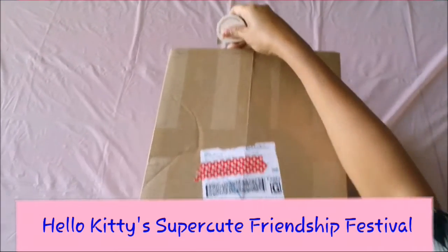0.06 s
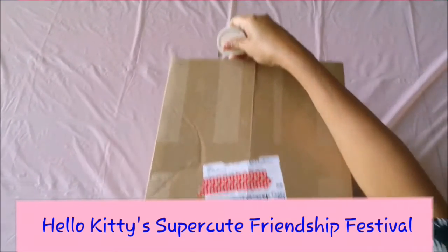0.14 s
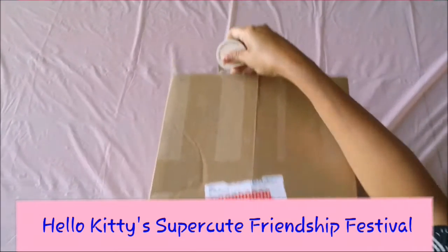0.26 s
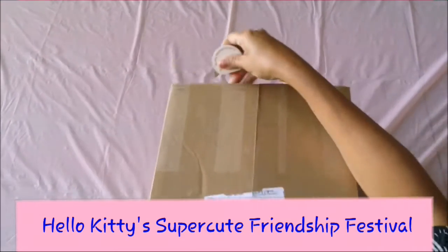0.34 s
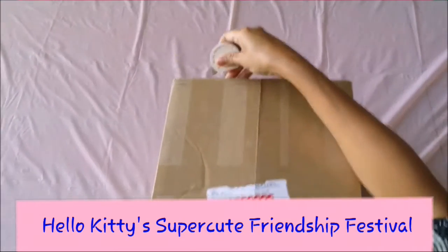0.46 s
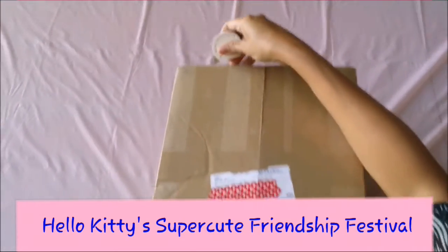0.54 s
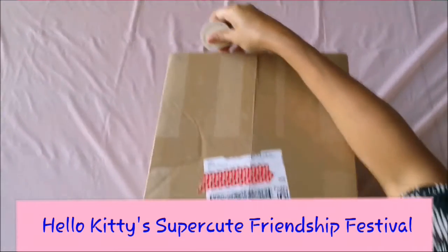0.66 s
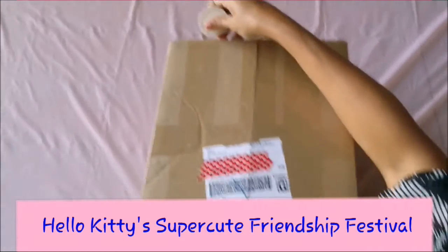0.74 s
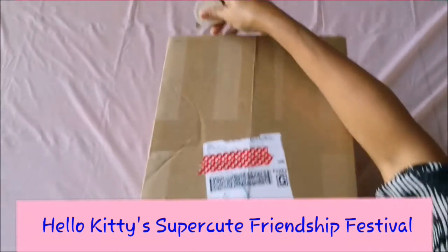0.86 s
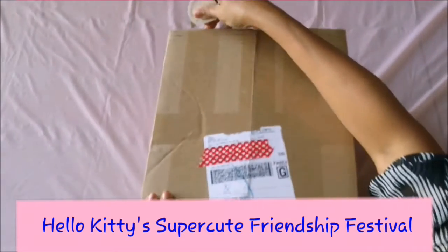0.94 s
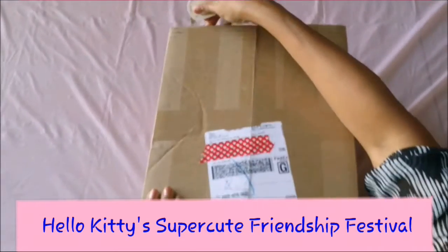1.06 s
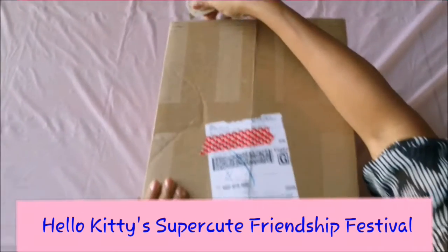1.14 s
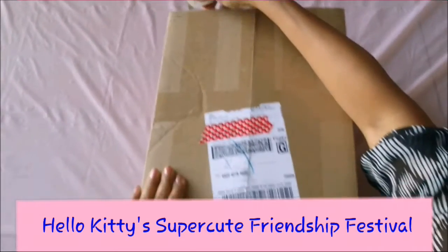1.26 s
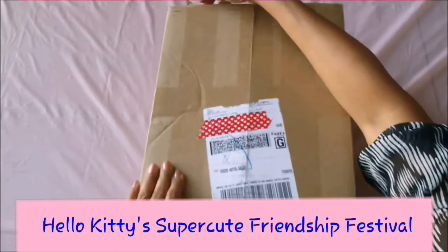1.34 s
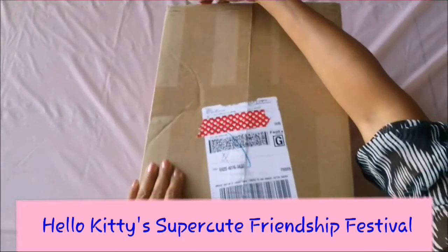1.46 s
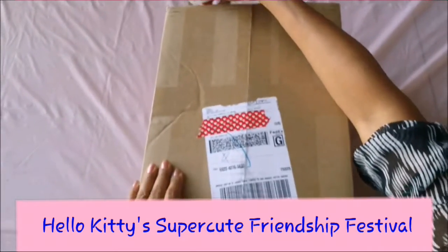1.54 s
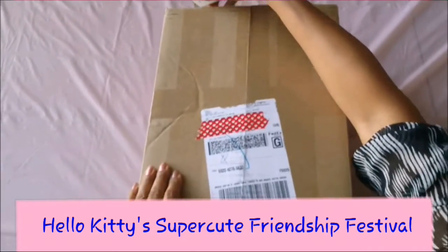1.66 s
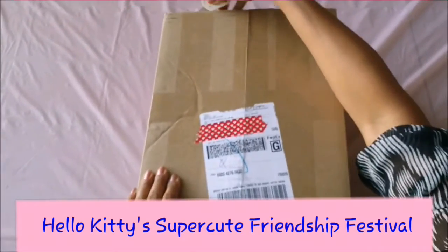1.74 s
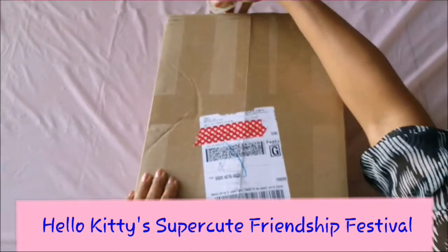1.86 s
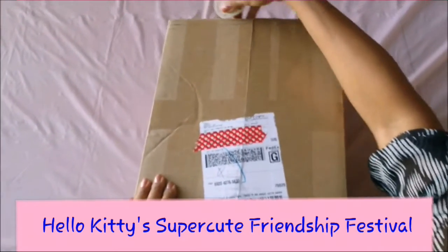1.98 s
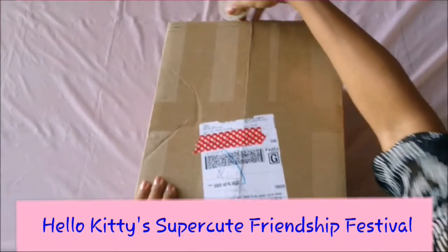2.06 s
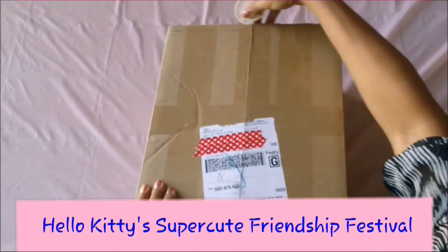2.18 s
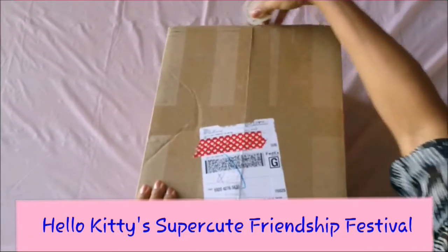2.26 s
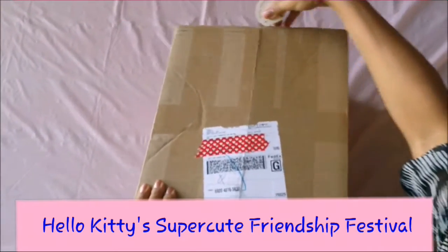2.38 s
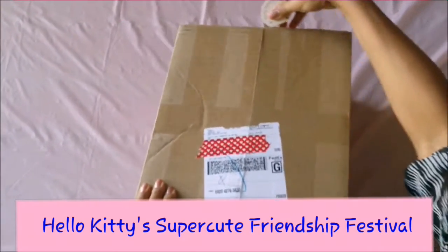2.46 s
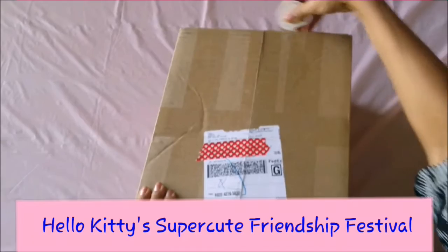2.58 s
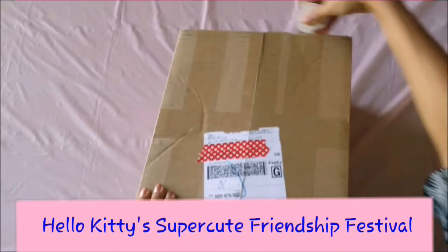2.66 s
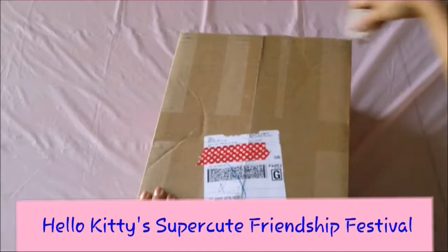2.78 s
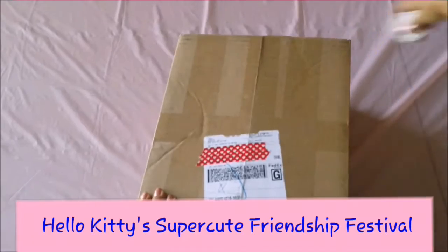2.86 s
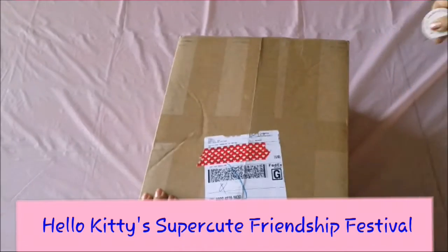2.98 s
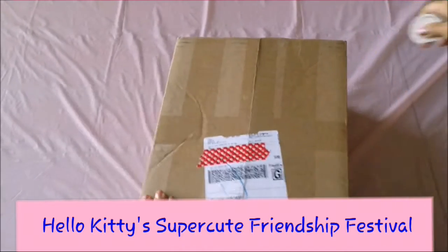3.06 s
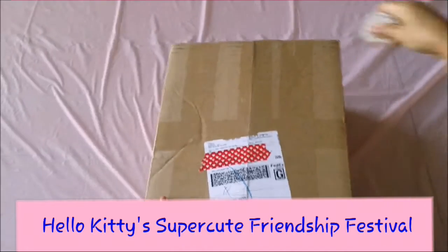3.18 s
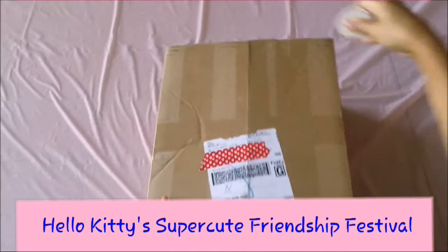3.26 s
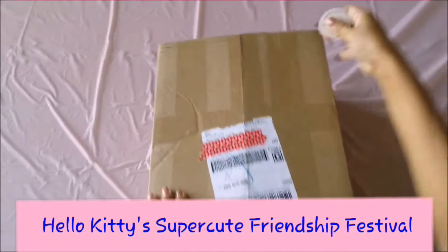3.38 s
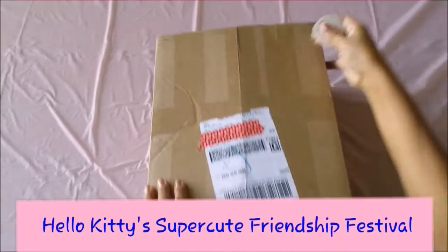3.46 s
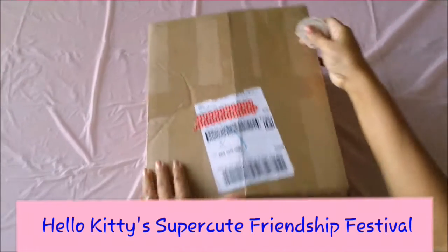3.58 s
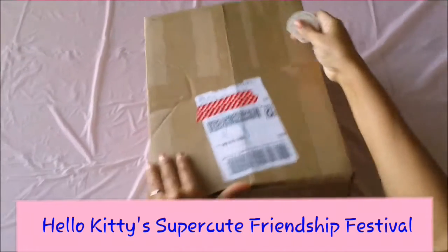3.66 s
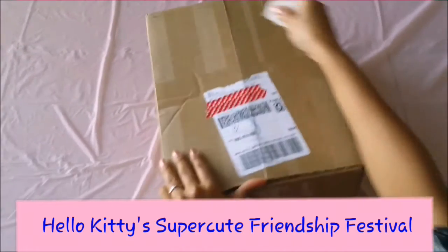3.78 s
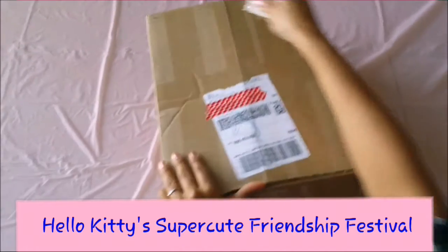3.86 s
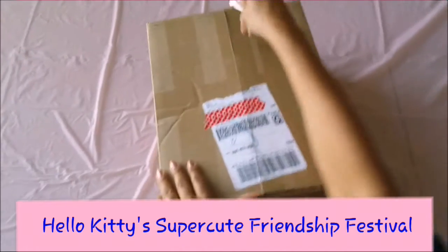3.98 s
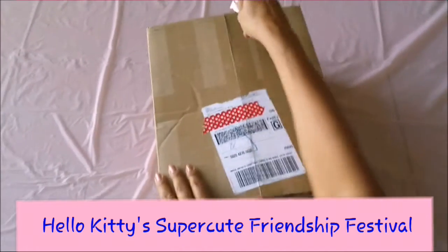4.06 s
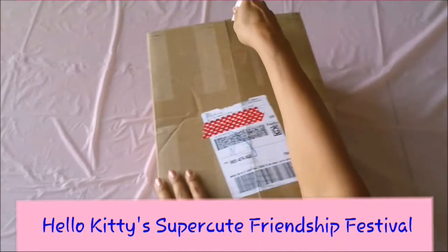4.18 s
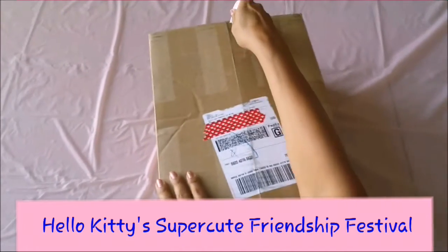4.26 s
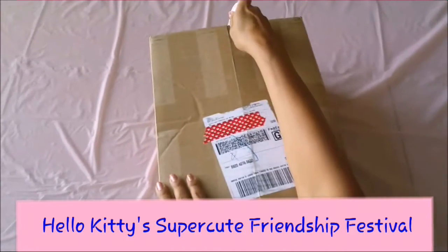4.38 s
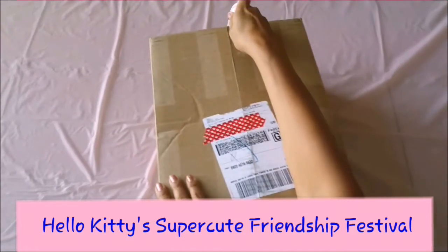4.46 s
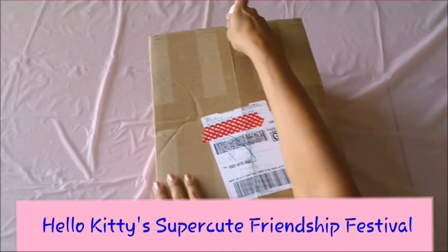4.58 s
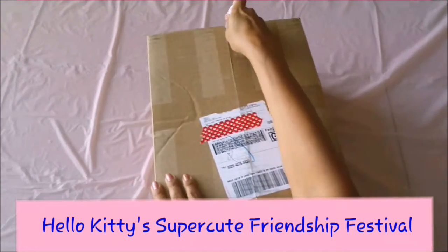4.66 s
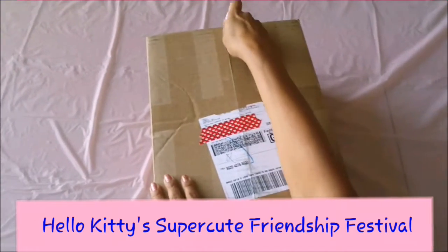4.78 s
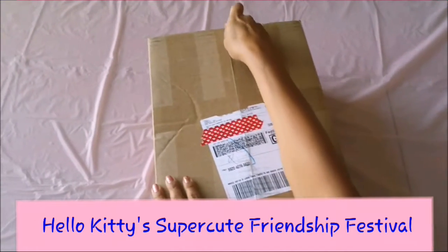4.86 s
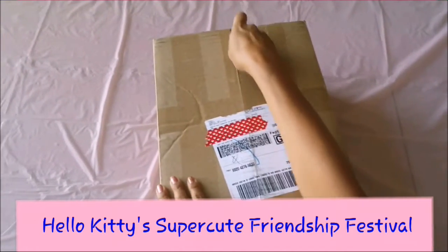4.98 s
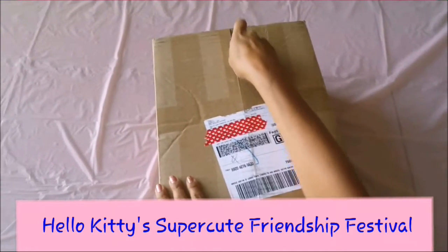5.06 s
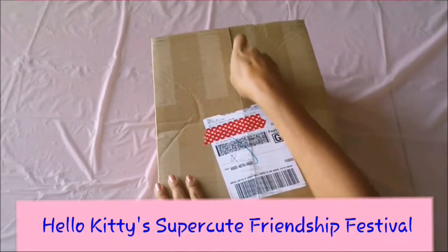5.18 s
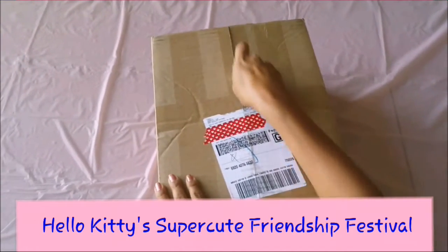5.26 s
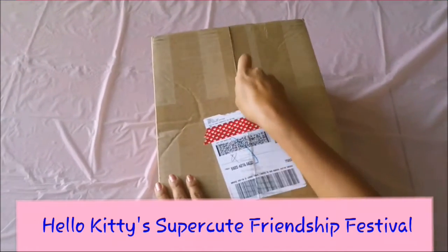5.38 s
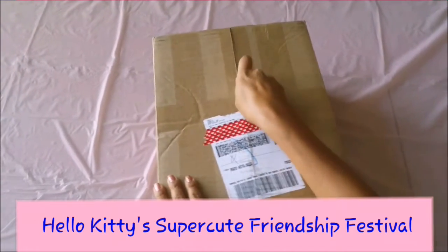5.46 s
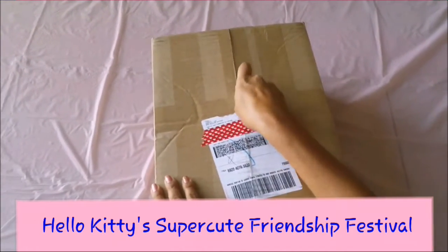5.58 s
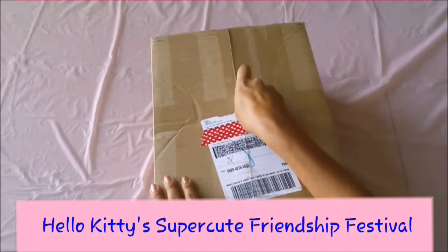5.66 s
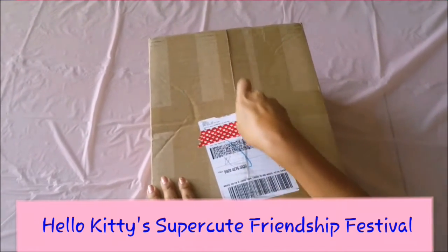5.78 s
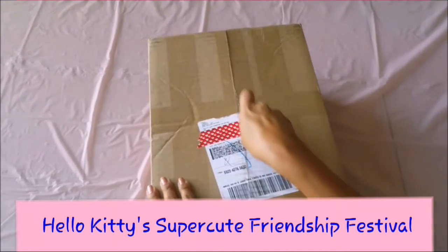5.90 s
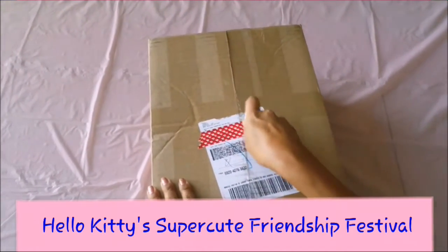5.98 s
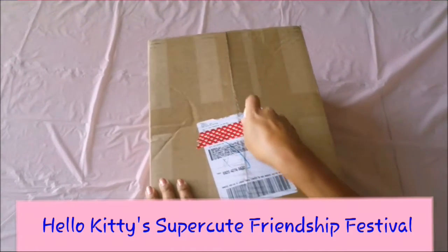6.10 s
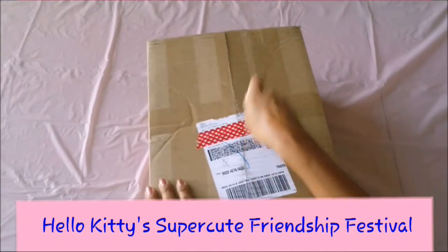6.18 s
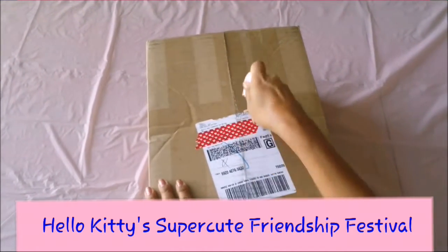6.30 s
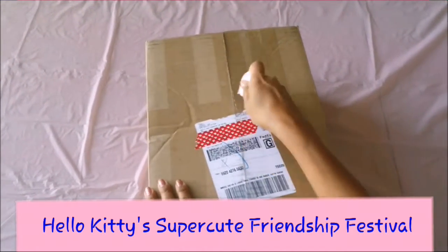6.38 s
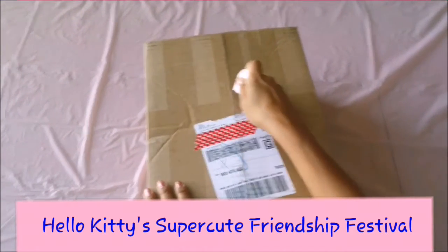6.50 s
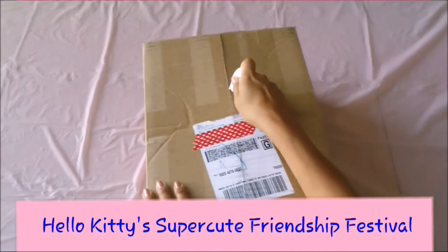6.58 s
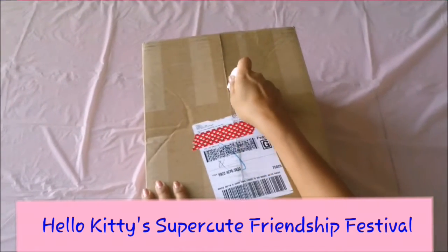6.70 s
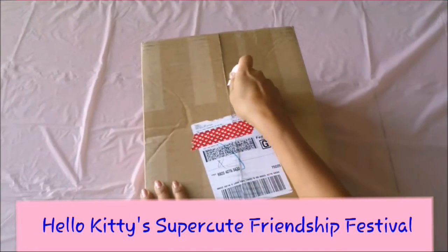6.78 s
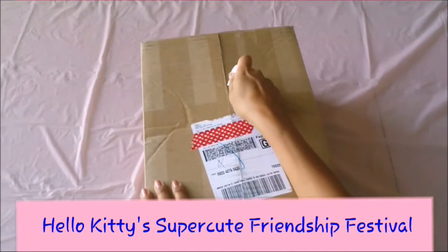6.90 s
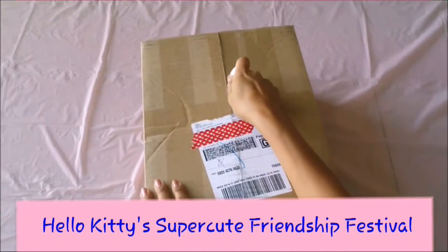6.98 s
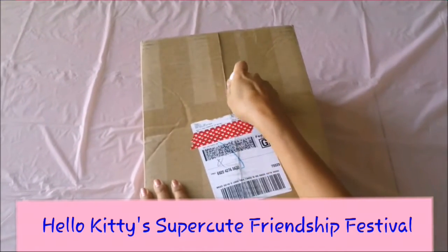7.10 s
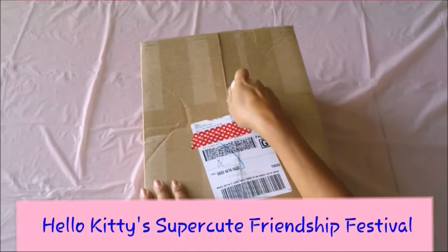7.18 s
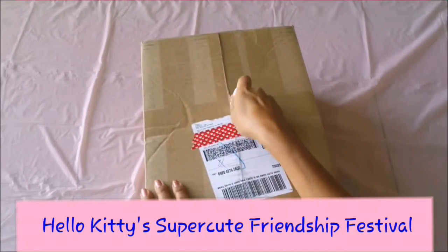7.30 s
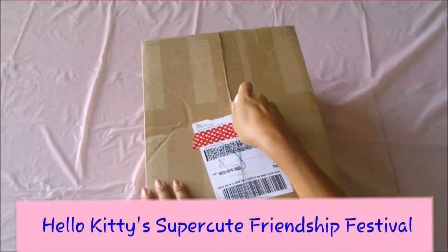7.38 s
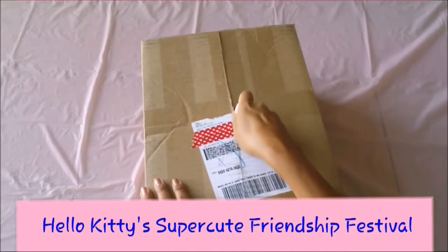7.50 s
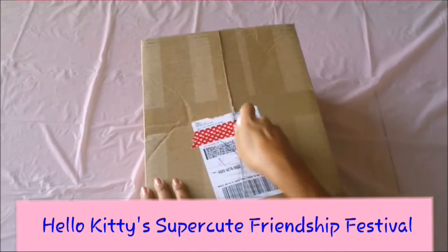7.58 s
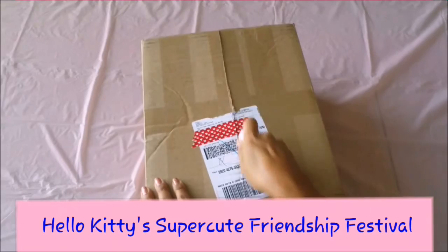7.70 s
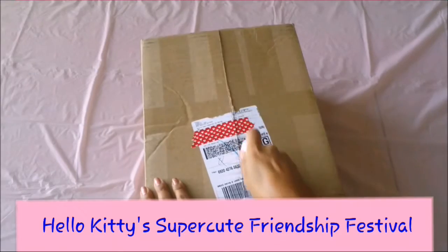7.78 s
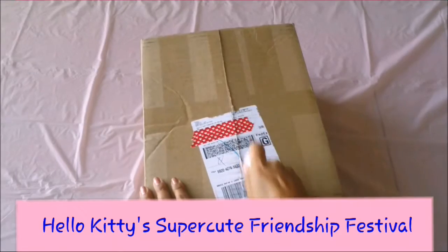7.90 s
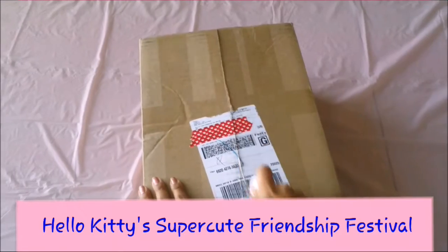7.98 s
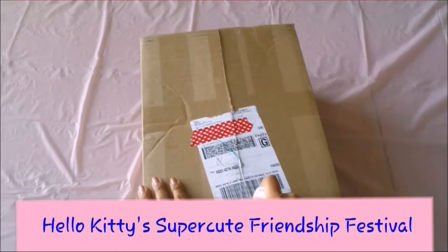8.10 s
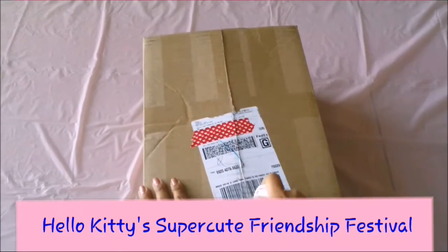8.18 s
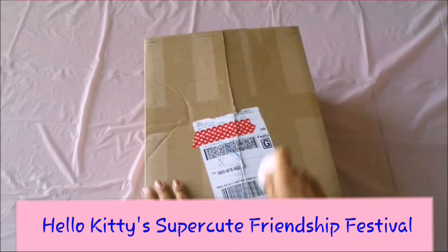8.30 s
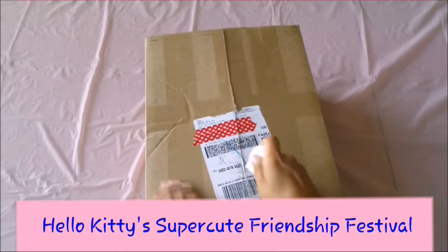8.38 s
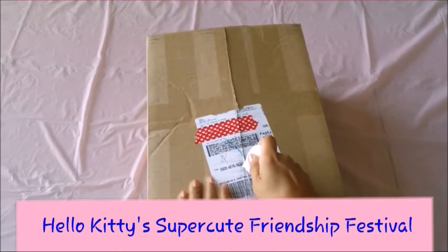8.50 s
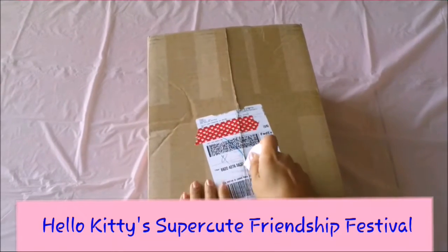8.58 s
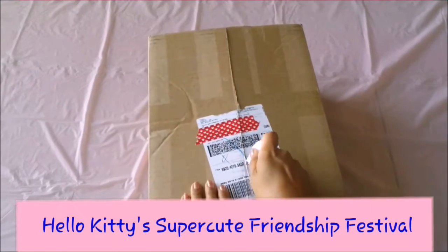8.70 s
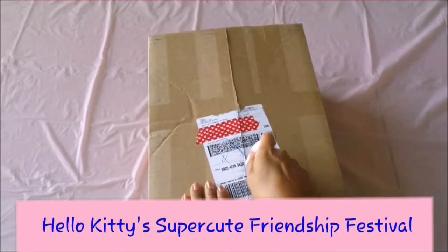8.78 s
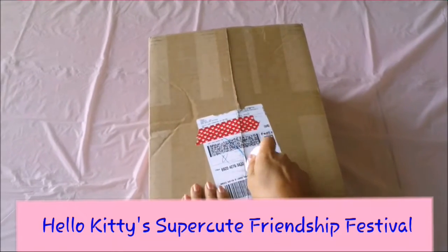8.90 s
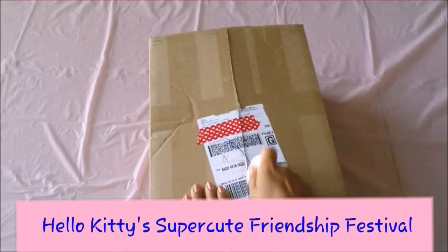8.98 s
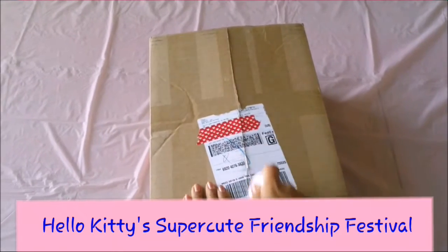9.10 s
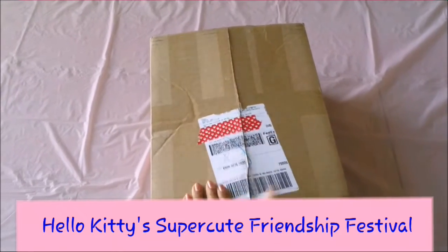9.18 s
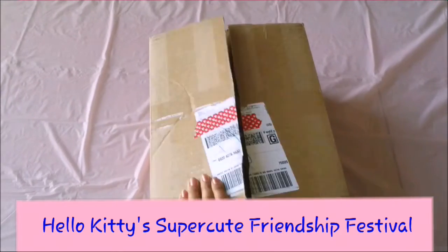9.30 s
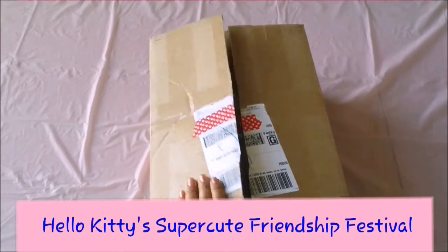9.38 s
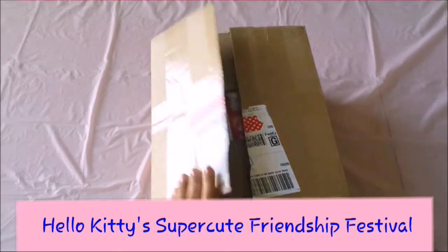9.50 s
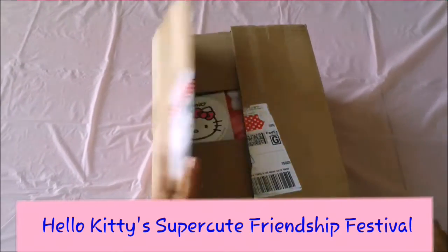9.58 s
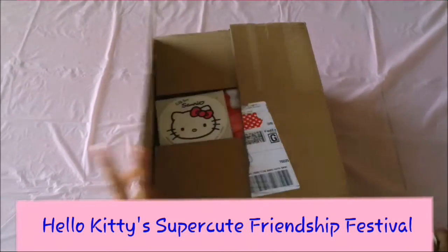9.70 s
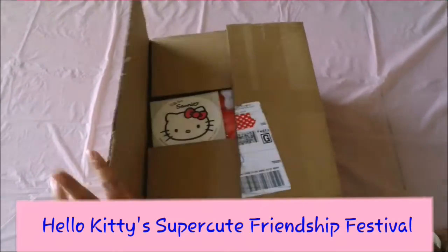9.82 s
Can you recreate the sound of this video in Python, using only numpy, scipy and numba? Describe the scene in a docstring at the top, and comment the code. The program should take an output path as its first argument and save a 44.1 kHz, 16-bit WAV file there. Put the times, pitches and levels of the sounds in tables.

```python
"""Scratchy strokes and sharp snaps over a hollow drumming: a hand cutter slits a cardboard box's tape.
The box stands on a cloth-covered table. Blade, hands and sliding box rub out a hiss, the taut tape zips,
the flaps rasp and the box drums along. Snapping tape fibres tick in the flaps; soft knocks ring the box.
Two small microphone ports hear it from above, in a quiet room."""
import sys
import numpy as np
from scipy import signal
from scipy.fft import rfft, irfft
from scipy.io import wavfile
from numba import njit

SR = 44100
rng = np.random.default_rng(int(sys.argv[2]) if len(sys.argv) > 2 else 0)


def file_out(sig):
    """Save sig as 16-bit WAV at sys.argv[1]."""
    # one column per channel
    cols = np.atleast_2d(sig).T
    # limit, then scale
    lim = np.clip(cols, -1, 1)
    pcm = np.round(lim * 32767).astype(np.int16)
    wavfile.write(sys.argv[1], SR, pcm)


N = 434385

# Colour of the still air: freq_hz, level_db
AIR_COLOUR = [(15, -30), (25, 1), (44, -12.5), (89, 0.5), (127, 2), (195, -7.5), (249, -11), (503, -10.5),
              (2610, -17), (3720, -23.5), (7920, -23), (14400, -29), (16000, -34)]
# How alike the two ports sound: freq_hz, likeness (1 the same, 0 or less unrelated)
PORT_LIKENESS = [(60, 0.92), (130, 0.91), (290, 0.88), (640, 0.63), (1410, 0.18), (3100, 0.077),
                 (6820, -0.077), (15000, -0.76)]
# Left port over right port: freq_hz, balance_db
PORT_BALANCE = [(60, -2), (200, 1.5), (700, -0.5), (1290, -1.5), (2380, 1.5), (4400, 8.5), (6200, 4),
                (8200, -3), (10500, -1.5), (15000, 4)]
# Resonances of the hollow box: pitch_hz, width_hz, level_db
BOX_MODES = [(79, 33, -9), (111, 22.4, 2.5), (155, 32.6, 0.5), (209.4, 58, -2.5), (260, 59, -2),
             (337.5, 24.3, -2.5), (388.4, 50, -3.5), (465, 88, -8), (663, 165, -12), (1027, 250, -16)]
# Resonances of the flaps: pitch_hz, width_hz, level_db
FLAP_MODES = [(780, 270, 0.5), (1060, 490, 2.5), (1490, 430, -0.5), (1830, 1000, -6.5), (2480, 610, 8),
              (3300, 2400, -10.5)]
# Colour of the rubbing hiss and of the cracks: freq_hz, level_db
HISS_COLOUR = [(1470, -18), (2500, -13), (3310, -8.5), (3770, -11), (5230, -8.5), (6060, -6), (8270, -2),
               (9890, -10), (14800, -13), (15500, -28), (16000, -10.5)]
# Knocks on the box panels: start_s, level_db, pitch_hz
BOX_KNOCKS = [(1.155, -42, 472), (1.8, -45, 91.5), (1.995, -45, 1070), (2.098, -43, 1020),
              (2.236, -44, 167), (2.347, -36.5, 375), (2.418, -44, 234), (2.89, -26.5, 286),
              (3.346, -44, 436), (3.631, -37.5, 483), (4.398, -54, 150), (4.634, -36.5, 705),
              (4.845, -37.5, 405), (5.36, -28, 264), (5.409, -28.5, 267), (5.706, -31, 326),
              (5.746, -32, 263), (5.761, -27.5, 265), (5.804, -21.5, 257), (5.837, -24, 247),
              (5.871, -25.5, 255), (5.946, -33, 330), (5.996, -31, 177), (6.05, -26.5, 260),
              (6.215, -40.5, 380), (6.263, -32, 262), (6.738, -43.5, 375), (6.843, -59, 328),
              (6.932, -54, 250), (7.048, -37.5, 325), (7.147, -38, 114), (7.341, -34.5, 238),
              (7.4, -32.5, 320), (7.47, -29.5, 234), (7.548, -33, 142), (7.732, -29, 134),
              (7.765, -29, 182), (7.983, -36, 125), (8.142, -36.5, 114), (8.299, -43, 160),
              (8.342, -40, 384), (8.486, -51, 915), (8.816, -43.5, 153), (8.895, -50, 199),
              (8.903, -37.5, 160), (9.091, -46, 121), (9.283, -20.5, 154), (9.486, -54.5, 148),
              (9.839, -20.5, 956)]
# Tape and fibre snaps: start_s, crack_db, tick_db (relative to the crack), flap_pitch_hz
TAPE_SNAPS = [(0.7167, -21.5, -12.5, 4290), (0.856, -38.5, -24, 4460), (0.883, -40, -4.5, 2440),
              (1.0593, -48, -16, 1730), (1.096, -43.5, -5, 1780), (1.268, -56, -4, 1500),
              (1.407, -43.5, -12, 3630), (1.442, -51, -4, 2400), (1.456, -48, -11, 2400),
              (1.5733, -44.5, -4, 1470), (1.6406, -35, -27, 1470), (1.6856, -29, -38, 1480),
              (1.997, -45, -21, 1630), (2.0207, -31.5, -1.5, 1230), (2.0992, -28.5, -8, 1390),
              (2.2733, -19, -12.5, 1040), (2.3154, -21.5, -21, 3370), (2.332, -40, -20, 3400),
              (2.3532, -28, -4, 1270), (2.4376, -37, -15, 1520), (2.4999, -35, -6, 2670),
              (2.551, -32.5, -8, 1370), (3.291, -34, -18, 1610), (3.3418, -35.5, -32, 1290),
              (3.996, -54.5, -5, 2500), (4.2506, -41.5, -15, 1150), (4.6377, -37.5, -3, 1260),
              (4.843, -38, 5.5, 1410), (5.554, -51, 7, 1550), (5.6562, -33.5, -25, 1550),
              (5.761, -31, -6, 1530), (5.8053, -20.5, -13, 1370), (5.8376, -24.5, -25, 2280),
              (5.998, -29.5, -6, 1340), (7.0477, -51, -3, 2150), (7.145, -36, -8.5, 1590),
              (7.18, -46, -9, 2150), (7.402, -28.5, -6, 1540), (7.4734, -34, -1, 1390),
              (7.663, -30, -24, 1110), (7.766, -24, -23, 1210), (8.098, -49, -7, 991),
              (8.1435, -26, -17, 990), (8.241, -38, -25, 1670), (8.3442, -36, -3.5, 1250),
              (8.4916, -35, -1, 2880), (8.497, -36, 4, 2070), (8.7798, -51.5, 4, 2600),
              (8.786, -50.5, 5, 2550), (8.8185, -38.5, 9, 2080), (8.8926, -47.5, 7, 950),
              (8.907, -43.5, 1, 1500), (9.0473, -51, -12, 1510), (9.151, -27, -15, 1870),
              (9.189, -26, -19, 3510), (9.2253, -16, -27, 4370), (9.2828, -17, -8.5, 1600),
              (9.617, -46, -7, 2510), (9.773, -53, -4, 2500)]
# Zip of the taut tape and hollow of the flap gap: time_s, zip_hz, hollow_hz, hollow_db (relative to rasp)
SLIT_TONES = [(0, 8450, 1800, -1.5), (1.55, 7600, 1510, 2.5), (1.92, 7800, 1230, 2),
              (2.4, 8300, 1220, -3.5), (2.58, 9200, 1410, -1.5), (2.9, 7900, 1350, -5),
              (3.3, 8400, 1710, -7), (4.8, 8290, 1630, 2), (5.05, 9030, 1530, -3), (5.45, 8430, 1750, -1),
              (5.8, 8100, 1470, -4.5), (7.75, 7730, 1355, -2), (8.15, 8100, 1220, -7.5),
              (8.5, 8240, 2070, 0), (9.1, 7100, 1530, -7.5), (9.85, 7900, 1520, -0.5)]
# Strokes of blade, hands and sliding box, with rasp and drum relative to the hiss:
# start_s, length_s, hiss_start_db, hiss_end_db, rasp_db, drum_start_db, drum_end_db
RUB_STROKES = [(0, 0.39, -43, -43, -16, -20, -20.5), (.72, 0.067, -63, -65.5, -17, -1, 4.5),
               (0.863, 0.069, -64, -71.5, -5, -1, 3), (1.057, 0.03, -70, -65.5, -3, -5, -8),
               (1.4, 0.1, -72, -81, 1, 0, -10), (1.635, 0.26, -45.5, -42.5, -8.5, -18, -3),
               (2.0, 0.022, -47.5, -41.5, -4.7, -12, -1.5), (2.105, .27, -45, -42, -6, -2.5, -4.5),
               (2.4, 0.17, -55, -52, -3.5, 0.1, -7), (2.577, .14, -40, -35, -7, -20, -20),
               (2.749, 0.13, -35.5, -31, -6.5, -15.5, -21), (2.967, 0.11, -64.5, -62, -4.5, 10, -7),
               (3.123, 0.27, -65, -50.5, -4.5, -0.5, -4.5), (3.419, 0.38, -43.5, -41.5, -14.5, -24, -16),
               (3.99, 0.064, -72.5, -65, -12, -5, -8), (4.645, 0.08, -61, -75, -8, 3.5, -1),
               (4.802, .03, -64, -61, -3.5, 5, -7), (4.84, .04, -45.5, -55, -7, 1, 0),
               (4.886, .11, -52, -50.5, -2.5, -9, -2.5), (5.053, 0.19, -47.5, -43, -5, -9.5, -5),
               (5.268, 0.19, -46.5, -43.5, -2.5, -3.5, -4), (5.564, 0.025, -49.5, -45, 3, 3.5, -7),
               (5.666, 0.023, -46.5, -43.5, 0.5, 2, -2), (5.786, .17, -41, -47.5, -3, 3, 4),
               (5.982, 0.066, -45, -49, -3, 7, -6), (6.216, .05, -68.5, -57.5, 1.5, 13.5, 10),
               (6.741, 0.013, -60, -68, -0.5, 0, -4), (7.052, 0.052, -60, -72.5, 0, 13.5, 7),
               (7.105, 0.264, -58.5, -46, -2.6, 4, -2.5), (7.408, 0.037, -44, -52.5, -2.5, 0, -3),
               (7.475, 0.058, -46, -44.5, -5.5, 2, -2), (7.554, 0.375, -44.5, -39, -7.5, -3, -4),
               (7.982, 0.2, -33, -44.5, -4.5, -1, -9.5), (8.176, 0.14, -56, -65.5, 0, -1, 5),
               (8.33, 0.0081, -51.5, -53, -4, 3, 7), (8.38, 0.074, -57, -59, -13, 1, -6),
               (8.493, 0.041, -53.5, -75, 1.5, 2, 15), (8.821, 0.045, -62, -67, -2, 14.5, -1),
               (8.892, 0.12, -56.5, -68.5, 1.5, 14.5, 5), (9.087, .21, -38, -36, -5.5, -2.5, -9),
               (9.315, 0.11, -57.5, -67.5, -7, 18, 3), (9.494, 0.11, -57.5, -58, -10, -1.5, -12),
               (9.777, 0.075, -71, -55.5, -5, -2, -2), (9.857, 0.018, -44.5, -50.5, 19, 26.5, 15)]

AIR_DB = -70
ROOM_T60_S, ROOM_DB, WALL_CUT_HZ = 0.37, -13, 7000
RUMBLE_CUT_HZ, TOP_CUT_HZ, FINGER_CUT_HZ = 42, 16000, 1230
SPOT_OCTAVES = 0.23   # a blow reaches the modes this near to the pitch of the struck spot
SPIKE_DB, SPIKE_T60_S, SNAP_T60_S, RUSTLE_T60_S = 1.5, 0.002, 0.018, 0.2
REST_HISS_DB, REST_RASP_DB, REST_DRUM_DB = -87, -81, -71   # hands resting on the box between strokes
ATTACK_DB_PER_S, JERK_SHARPNESS = 346, 3.5   # a fading stroke starts with a jerk, so its attack is faster
SLIDE_RELEASE_DB_PER_S, BITE_RELEASE_DB_PER_S = 192, 447   # a slide eases off, a biting blade stops short
WAVER_DB = 1.5   # the hand never presses evenly
ZIP_SLIDE_DB, ZIP_BITE_DB = -9.5, -3   # relative to the hiss
ZIP_WIDTH_HZ, HOLLOW_WIDTH_HZ = 2160, 690
FLAP_LOW_HZ, FLAP_HIGH_HZ = 540, 4380   # the flaps radiate little outside this band


def from_db(db):
    """Decibels to gain."""
    return 10 ** (np.asarray(db) / 20)


def rms_one(x):
    """Scaled to rms 1."""
    return x / np.sqrt(np.mean(x ** 2) + 1e-20)


def over_hz(points):
    """A table of (freq_hz, value) read on every bin of the spectrum."""
    hz, value = np.transpose(points)
    return np.interp(np.log(np.arange(N // 2 + 1) * SR / N + 1), np.log(hz), value)


def over_time(rows):
    """Rows of (time_s, values...) as one automation curve per value."""
    time_s, *columns = np.transpose(rows)
    return [np.interp(np.arange(N) / SR, time_s, column) for column in columns]


def wander(per_s):
    """A random drift that heads for a new value per_s times a second."""
    steps = rng.standard_normal(int(N / SR * per_s) + 2)
    return np.interp(np.arange(N) / SR * per_s, np.arange(len(steps)), steps)


def coloured(x, points):
    """EQ from a table of (freq_hz, level_db); white noise keeps its rms."""
    return irfft(rfft(x) * rms_one(from_db(over_hz(points))), N)


def port_noise():
    """White noise at both ports, centred in the bass, wide in the treble."""
    mid, side = rfft(rng.standard_normal((2, N)))
    alike = np.clip(over_hz(PORT_LIKENESS), 0, 1)
    return irfft(np.sqrt(1 + alike) * mid + np.sqrt(1 - alike) * side * [[1], [-1]], N) / np.sqrt(2)


def still_air():
    """Room tone: a faint, bass-heavy noise bed."""
    return from_db(AIR_DB) * coloured(port_noise(), AIR_COLOUR)


def room_reverb(x):
    """The walls return a short diffuse tail, duller than the source."""
    t = np.arange(SR) / SR
    tail = port_noise()[:, :SR] * from_db(-60 * t / ROOM_T60_S) * (t > .006)   # 6 ms pre-delay
    tail = signal.lfilter(*signal.butter(1, WALL_CUT_HZ, fs=SR), tail)
    tail = tail / np.sqrt(np.sum(tail ** 2, axis=1, keepdims=True))
    return from_db(ROOM_DB) * signal.fftconvolve(x, tail, axes=1)[:, :N]


def ring(x, hz, width_hz):
    """One resonance; a unit click sets it ringing at height 1."""
    r = np.exp(-np.pi * width_hz / SR)
    return signal.lfilter([.5, 0, -.5], [1, -2 * r * np.cos(2 * np.pi * hz / SR), r * r], x + 1e-18)


def cardboard(x, modes):
    """Cardboard rings in parallel resonances of alternating sign; white noise keeps about its rms."""
    power = sum(from_db(2 * level_db) * width_hz for _, width_hz, level_db in modes)
    rings = sum((-1) ** k * from_db(level_db) * width_hz * ring(x, hz, width_hz)
                for k, (hz, width_hz, level_db) in enumerate(modes))
    return rings * np.sqrt(4 * np.pi / SR / power)


def mode_shares(modes, spot_hz):
    """Share of a blow that each mode gets: most goes to those near the pitch of the spot it hits."""
    octaves_away = np.log2(np.transpose(modes)[0] / spot_hz[:, None])
    reach = np.exp(-(octaves_away / SPOT_OCTAVES) ** 2) + 1e-9
    reach = reach * from_db(rng.normal(0, 2.4, reach.shape))
    return reach / reach.sum(axis=1, keepdims=True)


def box_knocks():
    """Dull thumps: soft contacts set the box modes ringing, with no treble in the blow."""
    start_s, level_db, pitch_hz = np.transpose(BOX_KNOCKS)
    clicks = np.zeros((len(BOX_MODES), N))
    clicks[:, np.round(start_s * SR).astype(int)] = from_db(level_db) * mode_shares(BOX_MODES, pitch_hz).T
    rings = sum(ring(blows, hz, width_hz) for blows, (hz, width_hz, _) in zip(clicks, BOX_MODES))
    return signal.lfilter(*signal.butter(2, FINGER_CUT_HZ, fs=SR), 0.7 * rings)


def tape_snaps():
    """A fibre breaks with a spike, a noisy burst and a rustle; the same burst ticks in the flaps."""
    t = np.arange(4096) / SR
    noise = port_noise()
    cracks = np.zeros(N + len(t))
    ticks = np.zeros((len(FLAP_MODES), N + len(t)))
    flap_shares = mode_shares(FLAP_MODES, spot_hz=np.transpose(TAPE_SNAPS)[3])
    for (start_s, crack_db, tick_db, _), shares in zip(TAPE_SNAPS, flap_shares):
        span = slice(round(start_s * SR), round(start_s * SR) + len(t))
        spike = from_db(crack_db + SPIKE_DB - 60 * t / SPIKE_T60_S)
        burst = from_db(crack_db - 60 * t / SNAP_T60_S)
        rustle = from_db(crack_db - 60 * t / RUSTLE_T60_S)
        cracks[span] += spike + 0.26 * burst + 0.099 * rustle
        ticks[:, span] += np.outer(shares * from_db(tick_db), burst)
    flaps = sum(cardboard(0.77 * tick[:N] * noise, [mode]) for tick, mode in zip(ticks, FLAP_MODES))
    return coloured(cracks[:N] * noise, HISS_COLOUR) + flaps


@njit
def gliding_ring(x, cos_w, r):
    """A resonance whose centre moves sample by sample."""
    y = np.zeros_like(x)
    for i in range(2, x.shape[1]):
        for c in range(2):
            y[c, i] = x[c, i] - x[c, i - 2] + 2 * r * cos_w[i] * y[c, i - 1] - r * r * y[c, i - 2]
    return y


def whistle(hz, width_hz):
    """A breathy pitch: noise twice through a moving resonance; rms 1."""
    cos_w, r = np.cos(2 * np.pi * hz / SR), np.exp(-np.pi * width_hz / SR)
    return rms_one(gliding_ring(gliding_ring(port_noise(), cos_w, r), cos_w, r))


def grit(per_s, spread_db, t60_s, share):
    """The grain of friction, as a gain: a steady part plus small random catches that die away."""
    sizes = from_db(spread_db * np.minimum(rng.exponential(1, N), 4))
    clicks = sizes * (rng.random(N) < per_s / SR)
    catches = rms_one(signal.lfilter([1], [1, -from_db(-60 / (t60_s * SR))], clicks + 1e-18))
    return (1 + share * catches) / np.sqrt(1 + share + share ** 2)


def blade_bite(rasp_db):
    """0 for a smooth slide on cloth, 1 for a blade that shakes the flaps and catches."""
    return np.clip(1 + rasp_db / 14, 0, 1)


def stroke_envelopes():
    """Strokes attack, swell or fade, and release. Gives hiss in dB, and rasp and drum relative to it."""
    t = np.arange(0, N + 32, 32) / SR
    power = from_db([[REST_HISS_DB], [REST_RASP_DB], [REST_DRUM_DB]]) ** 2 * np.ones(len(t))
    for start_s, length_s, hiss_start_db, hiss_end_db, rasp_db, drum_start_db, drum_end_db in RUB_STROKES:
        progress = np.clip((t - start_s) / length_s, 0, 1)
        attack = ATTACK_DB_PER_S + JERK_SHARPNESS * max(hiss_start_db - hiss_end_db, 0) / length_s
        release = np.interp(blade_bite(rasp_db), [0, 1], [SLIDE_RELEASE_DB_PER_S, BITE_RELEASE_DB_PER_S])
        edge_db = attack * np.maximum(start_s - t, 0) + release * np.maximum(t - start_s - length_s, 0)
        hiss_db = hiss_start_db + (hiss_end_db - hiss_start_db) * progress - edge_db
        drum_db = drum_start_db + (drum_end_db - drum_start_db) * progress
        power += from_db([hiss_db, hiss_db + rasp_db, hiss_db + drum_db]) ** 2
    hiss_db, rasp_db, drum_db = 10 * np.log10(power)
    return over_time(np.transpose([t, hiss_db, rasp_db - hiss_db, drum_db - hiss_db]))


def rubbing():
    """Friction drives three layers: hiss with the tape's zip, rasping flaps and the drumming box."""
    hiss_db, rasp_db, drum_db = stroke_envelopes()
    hiss_db = hiss_db + WAVER_DB * wander(per_s=22)
    zip_hz, hollow_hz, hollow_db = over_time(SLIT_TONES)
    bite = blade_bite(rasp_db)
    fine = grit(per_s=500, spread_db=4, t60_s=0.006, share=0.5 * bite)
    rough = grit(per_s=300, spread_db=2.8, t60_s=0.012, share=0.75 * bite)
    coarse = grit(per_s=45, spread_db=5, t60_s=0.018, share=0.61)

    hiss = coloured(port_noise(), HISS_COLOUR)
    zip_db = ZIP_SLIDE_DB + (ZIP_BITE_DB - ZIP_SLIDE_DB) * bite + 4.5 * wander(per_s=40)
    tape_zip = from_db(zip_db) * whistle(zip_hz + 250 * wander(per_s=11), ZIP_WIDTH_HZ)
    scratch = fine * rms_one(hiss + tape_zip)

    flaps = cardboard(port_noise(), FLAP_MODES)
    hollow_db = hollow_db + 2.2 * wander(per_s=16)
    hollow = from_db(hollow_db) * whistle(hollow_hz + 120 * wander(per_s=15), HOLLOW_WIDTH_HZ)
    flap_band = signal.butter(2, [FLAP_LOW_HZ, FLAP_HIGH_HZ], "band", fs=SR, output="sos")
    rasp = from_db(rasp_db) * rough * rms_one(signal.sosfilt(flap_band, flaps + hollow))

    drum = cardboard(from_db(hiss_db + drum_db) * coarse * port_noise(), BOX_MODES)
    return from_db(hiss_db) * (scratch + rasp) + drum


def scene():
    """The box, panned a little to the right, with its reverb over the still air."""
    box = (rubbing() + box_knocks() + tape_snaps()) * from_db([[-2.2], [2.2]])
    return box + room_reverb(box) + still_air()


def record(dry):
    """Each port has its own colour; rumble and the very top are cut."""
    tilt_db = np.outer([.5, -.5], over_hz(PORT_BALANCE))
    heard = irfft(rfft(dry) * from_db(tilt_db), N)
    heard = signal.sosfilt(signal.butter(2, RUMBLE_CUT_HZ, "high", fs=SR, output="sos"), heard)
    return signal.sosfilt(signal.cheby2(14, 60, TOP_CUT_HZ, fs=SR, output="sos"), heard)


dry = scene()
out = record(dry)
file_out(out)
```